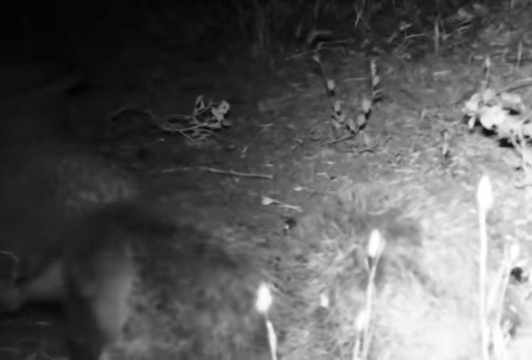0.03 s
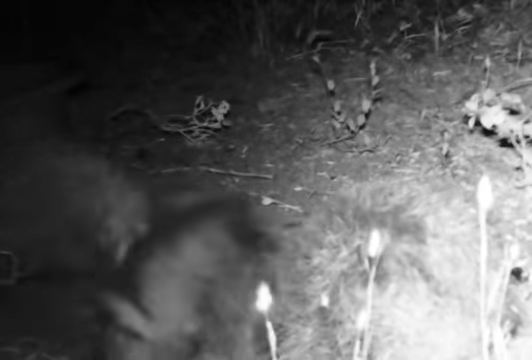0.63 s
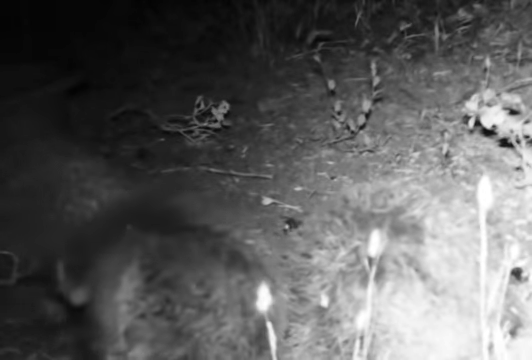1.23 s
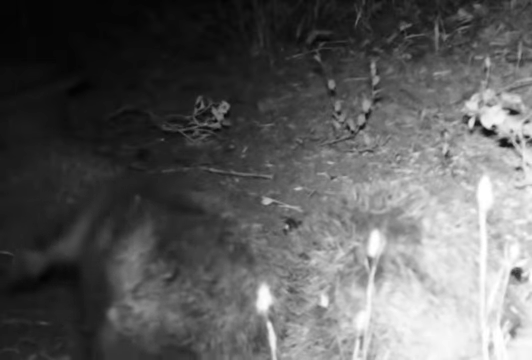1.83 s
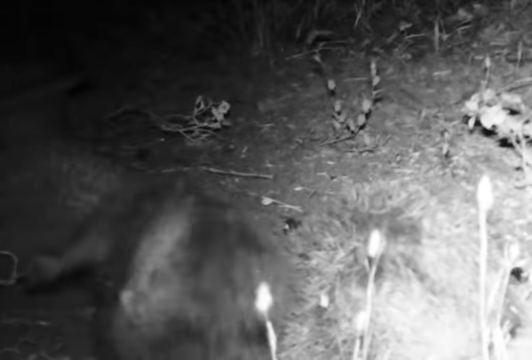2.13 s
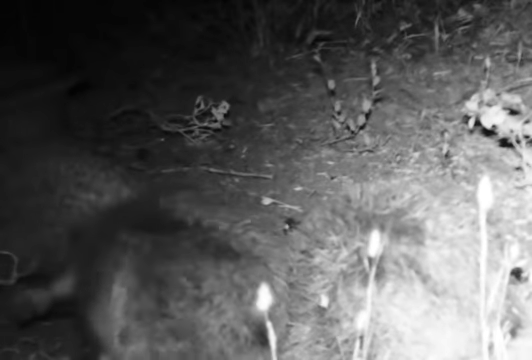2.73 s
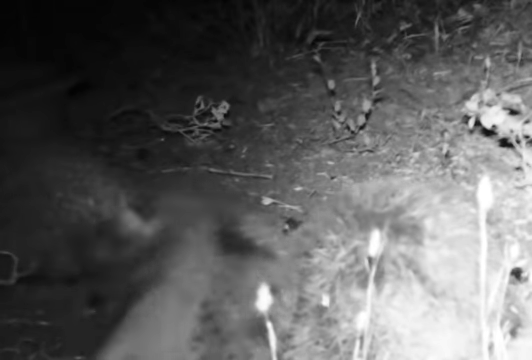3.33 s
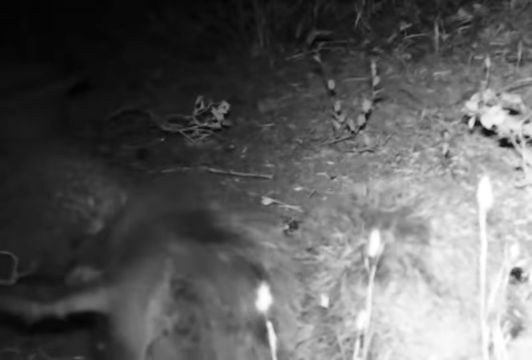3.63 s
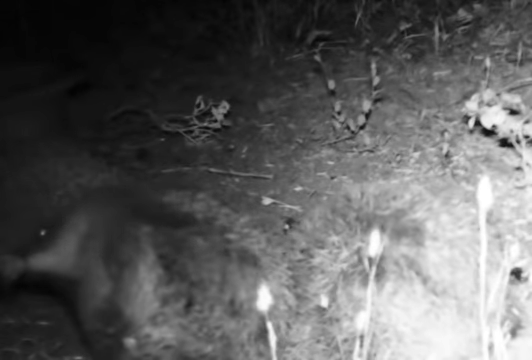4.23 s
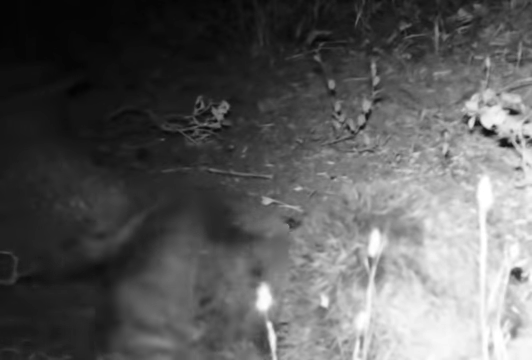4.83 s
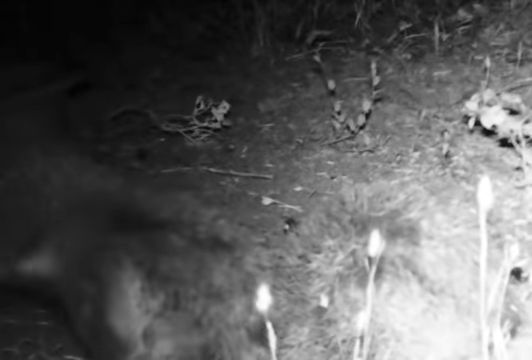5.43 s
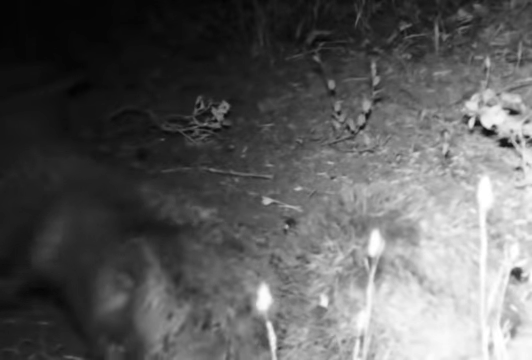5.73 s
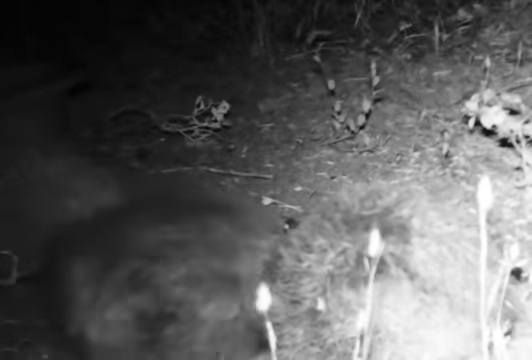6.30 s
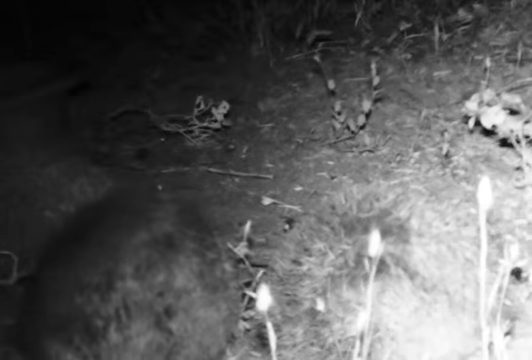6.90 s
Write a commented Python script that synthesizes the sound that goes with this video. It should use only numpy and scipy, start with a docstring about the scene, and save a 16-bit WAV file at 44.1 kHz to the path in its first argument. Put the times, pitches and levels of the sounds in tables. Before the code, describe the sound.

In a quiet garden at night, a bush-cricket chirps rapidly on a very high note over soft hiss and a low camera hum. Nearby, a hedgehog puffs sharply again and again at uneven intervals, loudest in the middle, with occasional dry rustles and tiny snaps of grit. A few faint, distant frog-like rattles come midway. The hedgehog finishes with a few paw scuffs, and the insect carries on.

```python
"""Hedgehog at night

A hedgehog huffs, each puff of air ringing its nose, and shuffles on dry earth near a humming camera.
A bush-cricket rubs its wings in quick double syllables; far off, something like a frog rattles at times.
Behind them: still air, faint insects and a low draught on the microphone."""
import sys
import numpy as np
from scipy import signal
from scipy.fft import rfft, irfft
from scipy.io import wavfile

SR = 44100
rng = np.random.default_rng(int(sys.argv[2]) if len(sys.argv) > 2 else 0)


def wrap_up_sound(samples):
    """Save the sound to the file named by the first command line argument, as 16-bit audio."""
    columns = np.atleast_2d(samples).T
    # keep every value between -1 and 1, then stretch to whole-number steps
    tamed = np.clip(columns, -1, 1)
    steps = np.round(tamed * 32767).astype(np.int16)
    wavfile.write(sys.argv[1], SR, steps)


N = 315756
TIME = np.arange(N) / SR


def amp(db):
    """Decibels to gain."""
    return 10 ** (np.asarray(db) / 20)


def unit(x):
    """Scale to rms 1."""
    return x / np.sqrt(np.mean(x ** 2) + 1e-20)


def colour(x, points):
    """Filter by (frequency [Hz], gain [dB]) points; rms 1."""
    hz, db = np.transpose(points)
    f = np.fft.rfftfreq(len(x), 1 / SR)
    gain = amp(np.interp(np.log(f + 1), np.log(hz + 1), db))
    return unit(irfft(rfft(x) * gain, len(x)))


def resonant_noise(modes, size):
    """Noise in steep resonances of (centre [Hz], width [Hz], gain [dB]); rms 1."""
    f = np.fft.rfftfreq(size, 1 / SR)
    power = sum(amp(db) ** 2 / (1 + ((f - hz) / (0.73 * width)) ** 2) ** 2 for hz, width, db in modes)
    return unit(irfft(rfft(rng.standard_normal(size)) * np.sqrt(power), size))


def wander(hz, size=N):
    """Smooth random signal up to about hz; rms 1."""
    f = np.fft.rfftfreq(size, 1 / SR)
    return unit(irfft(rfft(rng.standard_normal(size)) * np.exp(-(f / hz) ** 2), size))


def swell(t, rise_s, fall_s):
    """Exponential rise and fall, 1 at t = 0."""
    return np.exp(-np.maximum(-t / rise_s, t / fall_s))


def swells(rows):
    """Envelope of smooth bumps at (peak time [s], half length [s], level [dB])."""
    return np.sqrt(sum(amp(db) ** 2 * np.exp(-((TIME - s) / half) ** 2) for s, half, db in rows))


def add(mix, start_s, sound):
    """Mix a sound in at start_s."""
    start = round(start_s * SR)
    sound = sound[max(-start, 0):]
    part = mix[max(start, 0):][:len(sound)]
    part += sound[:len(part)]


def garden(x, t60_s, wet_db):
    """Add scatter from ground and plants: sparse, decaying echoes."""
    t = TIME[:SR // 2]
    taps = rng.choice([-1., 1.], len(t)) * (rng.random(len(t)) < 2000 / SR)
    taps *= (t > .004) * amp(-60 * t / t60_s)
    return x + amp(wet_db) * signal.fftconvolve(x, taps / np.linalg.norm(taps))[:N]


def night(air_db=-49, chorus_db=-61, calm_db=-35):
    """Steady air, the fizz of far insects and a draught mostly below hearing."""
    # night air and microphone hiss: (frequency [Hz], gain [dB])
    air_tone = [(30, -4.5), (60, 1), (100, 1), (165, -7.5), (270, -6), (400, -12.5), (620, -14.5),
                (850, -15), (1200, -18), (1900, -20), (2600, -23.5), (3500, -27), (5000, -31.5),
                (8000, -40), (14000, -61)]
    # far insects: (frequency [Hz], gain [dB])
    chorus_tone = [(1500, -53), (4500, -10), (7000, -5.5), (8000, -4), (8800, 3.5), (9600, 0),
                   (10500, -1.5), (12000, -8), (14500, -9)]
    # draught on the microphone: (frequency [Hz], gain [dB])
    draught_tone = [(1, -11), (5, -5.5), (13, -1.5), (19, 0), (29, -22), (37, -29), (50, -28), (200, -85)]
    # its slow puffs: (peak time [s], half length [s], level [dB])
    gusts = [(0.106, .16, -26.5), (1.39, 0.14, -25), (3.094, 0.33, -28), (4.234, 0.21, -24.5),
             (5.3, .15, -27.5), (5.95, 0.21, -30)]
    air = colour(rng.standard_normal(N), air_tone) * amp(air_db)
    chorus = colour(rng.standard_normal(N), chorus_tone) * amp(chorus_db + .9 * wander(30))
    draught = colour(rng.standard_normal(N), draught_tone) * np.hypot(amp(calm_db), swells(gusts))
    return air + chorus + draught


def camera_hum(base_hz=40.54, waver_db=1.0, whine_db=-48):
    """Low buzz plus a whine on the eighth harmonic, both wavering in level."""
    # buzz partials: (harmonic number, rms level [dB])
    partials = [(1, -52.5), (2, -54), (3, -55), (5, -68.5)]
    turns = base_hz * TIME + 0.012 * wander(1.36)
    buzz = sum(amp(db + waver_db * wander(6.7)) * np.sin(2 * np.pi * (k * turns + rng.random()))
               for k, db in partials)
    whine = amp(whine_db) * (1 + 0.21 * wander(11)) * np.sin(2 * np.pi * 8 * turns)
    return np.sqrt(2) * (buzz + whine)


def far_singers(note_hz=2800, width_hz=130, flutter_db=1.1):
    """Faint singers across the garden swell and fade on one note."""
    # songs: (peak time [s], half length [s], level [dB])
    songs = [(.6, .4, -67.5), (4, 0.26, -68), (5.9, 0.77, -70.5)]
    return swells(songs) * amp(flutter_db * wander(31)) * resonant_noise([(note_hz, width_hz, 0)], N)


def rattles(pulse_hz=35, depth=0.5, scoop_hz=302, width_hz=300, hoarse_db=-6, ends_db=-16, trim_db=-2):
    """Rough pulses through a throat resonance that scoops up and sags, blurred by distance."""
    # calls: (start [s], length [s], level [dB], pitch ceiling [Hz], sag [Hz])
    calls = [(1.651, 0.2, -56, 2720, 199), (2.42, 0.28, -54, 2766, 100), (3.553, .31, -49.5, 3010, 731),
             (4.477, .53, -48, 3003, 498)]
    loudest_at, sag_at = 0.63, 0.72  # fractions of a call
    out = np.zeros(N)
    for start, length, db, top_hz, sag_hz in calls:
        t = np.arange(0, length, 1 / SR)
        progress = t / length
        sag = .5 + .5 * np.tanh((progress - sag_at) / 0.126)
        hz = top_hz - scoop_hz * np.exp(-progress / 0.27) - sag_hz * sag
        off_peak = np.maximum(1 - progress / loudest_at, (progress - loudest_at) / (1 - loudest_at))
        arch_db = ends_db * off_peak ** 1.76
        phase = 2 * np.pi * np.cumsum(hz) / SR
        throat = wander(width_hz, len(t)) * np.cos(phase) + wander(width_hz, len(t)) * np.sin(phase)
        hoarse = amp(hoarse_db) * resonant_noise([(1260, 310, 0.37), (2360, 1300, -2.2)], len(t))
        pulses = 1 + depth * np.cos(2 * np.pi * pulse_hz * t + 0.62 * wander(13, len(t)))
        add(out, start, unit((throat + hoarse) * pulses) * amp(db + arch_db + trim_db))
    return garden(out, t60_s=0.7, wet_db=-7)


def cricket(high_hz=8957, low_hz=8527, tooth_hz=490, tooth_depth=.55, start_db=-47.5, fade_db_per_s=0.49):
    """Two strokes a chirp: the file's teeth ring the wing, whose note sinks as the stroke slows."""
    # bouts of even chirping: (first chirp [s], last chirp [s], period [s])
    bouts = [(.0321, 5.961, .082346), (6.186, 7.158, .081)]
    # wing strokes of a chirp: (peak delay [s], rise [s], hold [s], fall [s], relative level [dB])
    strokes = [(-.002, 0.0018, 0.0049, 0.0044, -1), (0.0226, 0.0028, 0.011, 0.0023, -3.5)]
    sink_at_s, sink_time_s, sink_loss_per_s = 0.0042, 0.0009, .11
    size_spread_db, onset_spread_s, sink_spread_s = 2.4, 0.00099, 0.0013
    out, t = np.zeros(N), np.arange(-.012, .03, 1 / SR)
    bite = np.exp(-(t / 0.0097) ** 2)  # teeth bite hardest at the peak
    for first, last, period in bouts:
        for s in np.arange(first, last + period / 2, period):
            for delay, rise, hold, fall, db in strokes:
                detune, size, late, speed, lag, offset = rng.standard_normal(6)
                slowing = .5 + .5 * np.tanh((t - sink_at_s - sink_spread_s * lag) / (2 * sink_time_s))
                low_share = slowing * np.clip(1 - sink_loss_per_s * s, 0, 1)  # wanes over the song
                rad_per_hz = 2 * np.pi * (1 + .003 * detune) * t
                jitter = 0.4 * (.5 + bite) * wander(1420, len(t))
                high = np.sqrt(1 - low_share) * np.sin(high_hz * rad_per_hz + jitter)
                low = np.sqrt(low_share) * np.sin(low_hz * rad_per_hz + jitter + np.pi * offset)
                tooth_phase = 2 * np.pi * tooth_hz * (1 + 0.086 * speed) * t + np.pi * late
                teeth = 1 + tooth_depth * bite * np.cos(tooth_phase)
                envelope = swell(t - np.clip(t, 0, hold), rise, fall)
                gain = amp(start_db + db - fade_db_per_s * s + size_spread_db * size)
                add(out, s + delay + t[0] + onset_spread_s * late, gain * envelope * teeth * (high + low))
    return garden(out, t60_s=0.06, wet_db=-9)


def shuffles(grains_per_s=2500, grain_spread_db=1.0, clump_db=1.4, shove_trim_db=-1):
    """Many tiny scrapes of spines and claws, with a few paw scuffs and snaps of grit."""
    # feet and spines brushing the ground: (peak time [s], rise [s], fall [s], level [dB])
    shoves = [(.46, 0.051, 0.11, -47), (2.98, 0.051, 0.1, -45), (4.47, .04, 0.034, -49),
              (4.68, 0.16, 0.063, -52), (4.775, .02, 0.056, -56), (5.95, 0.079, 0.11, -45.5),
              (6.34, 0.11, 0.034, -53.5)]
    # dry earth and litter: (frequency [Hz], gain [dB])
    litter_tone = [(250, 5), (600, 16), (1000, 10.5), (2000, 8.5), (4000, 5.5), (7000, 2), (9500, 3.5),
                   (12000, 3.5), (14500, -5)]
    # paw scuffs: (time [s], level [dB])
    scuffs = [(6.031, -49), (6.208, -43.5)]
    # their dull scrape: (frequency [Hz], gain [dB])
    scuff_tone = [(200, -10), (500, -5), (900, 5), (2000, -9), (4000, -16.5), (7000, -18), (14000, -27)]
    # snapping grit: (time [s], level [dB])
    snaps = [(.585, -38), (4.751, -42.5), (6.002, -42)]
    # its bright crack: (frequency [Hz], gain [dB])
    crack_tone = [(500, -6), (3000, -4), (6000, 3), (14000, -1)]
    sizes = amp(grain_spread_db * np.minimum(rng.exponential(1, N), 4))
    grains = unit(sizes * rng.standard_normal(N) * (rng.random(N) < grains_per_s / SR))
    scrapes = (grains + 2.0 * rng.standard_normal(N)) * amp(clump_db * wander(140))
    effort = np.sqrt(sum((amp(db) * swell(TIME - s, rise, fall)) ** 2 for s, rise, fall, db in shoves))
    paws = sum(amp(db) * swell(TIME - s, rise_s=0.0045, fall_s=0.013) for s, db in scuffs)
    out = colour(scrapes, litter_tone) * effort * amp(shove_trim_db)
    out += colour(scrapes, scuff_tone) * paws
    t = TIME[:512]
    for s, db in snaps:
        add(out, s, amp(db) * colour(rng.standard_normal(len(t)), crack_tone) * np.exp(-t / 0.00097))
    return out


def huffs(peakedness=1.63, flutter_db=0.92, rasp_width_hz=900, trim_db=-1.5):
    """Puffs of air ring the nose; rasp and hiss join while the flow is fastest."""
    # puffs: (peak time [s], half length [s], level [dB], nose resonance [Hz],
    #         rasp [dB re level], rasp centre [Hz], hiss [dB re level])
    puffs = [(0.175, 0.031, -45, 980, -9, 3500, -17), (0.499, 0.024, -48, 950, -15, 3400, -14),
             (1.114, 0.021, -40.5, 955, -6, 3750, -16), (1.478, 0.023, -45.5, 885, -8.5, 3330, -17),
             (1.924, .02, -44.5, 976, -11, 3320, -22), (2.263, 0.022, -37.5, 950, -13, 3350, -12.5),
             (2.631, .024, -37, 970, -14.5, 3540, -8.5), (2.976, .023, -37.5, 940, -29, 3700, -8),
             (3.505, 0.024, -41, 967, -11, 3440, -17), (4.137, 0.025, -36.5, 1010, -9, 3500, -11),
             (4.516, .02, -37, 1006, -7.5, 4330, -8), (5.159, .033, -46.5, 856, -9.5, 3350, -15),
             (5.617, 0.024, -44.5, 886, -6, 3540, -21), (5.919, 0.022, -39, 984, -16, 3670, -12)]
    # nose modes: (ratio to nose resonance, width [Hz], gain [dB])
    nose_modes = [(.31, 101, 0.5), (.5, 115, 0.3), (.765, 84, 1.5), (1.025, 184, 3), (1.45, 450, -14),
                  (2.08, 725, -7.5), (3.1, 1500, -20)]
    # air jet at the nostrils: (frequency [Hz], gain [dB])
    hiss_tone = [(1000, -33), (3000, -35), (4600, -0.5), (5500, -1.5), (6600, 2.5), (7500, -2), (9500, -2),
                 (11500, -11.5), (14000, -7)]
    out, t = np.zeros(N), np.arange(-6144, 6144) / SR
    for s, half, db, nose_hz, rasp_db, rasp_hz, hiss_db in puffs:
        flow = np.exp(-.5 * np.maximum(-t / (0.94 * half), t / half) ** peakedness)
        jet = np.exp(-.5 * ((t - .002) / (0.94 * half)) ** 2)
        modes = [(ratio * nose_hz, width, gain_db) for ratio, width, gain_db in nose_modes]
        nose = resonant_noise(modes, len(t))
        rasp_modes = [(rasp_hz * 0.9, rasp_width_hz, 0), (rasp_hz * 1.117, rasp_width_hz * 0.4, -1)]
        rasp = resonant_noise(rasp_modes, len(t))
        hiss = colour(rng.standard_normal(len(t)), hiss_tone)
        puff = flow * nose + jet * (amp(rasp_db) * rasp + amp(hiss_db) * hiss)
        add(out, s + t[0], puff * amp(db + trim_db + flutter_db * wander(94, len(t))))
    return garden(out, t60_s=0.11, wet_db=-8.5)


def scene():
    """All sources at one microphone."""
    return (huffs() + shuffles() + cricket() + rattles() + far_singers() + camera_hum() + night())[None]


def record(dry):
    """The recorder's band limit."""
    edge_hz = 14600
    lowpass = signal.firwin(801, edge_hz, window=("kaiser", 9), fs=SR)
    return signal.oaconvolve(dry, lowpass[None], "same")


dry = scene()
out = record(dry)
wrap_up_sound(out)
```